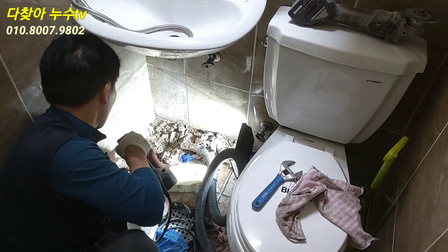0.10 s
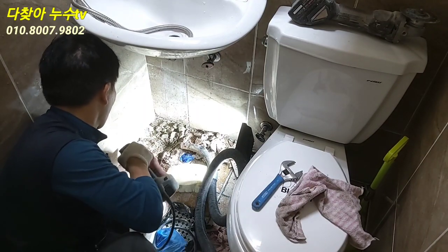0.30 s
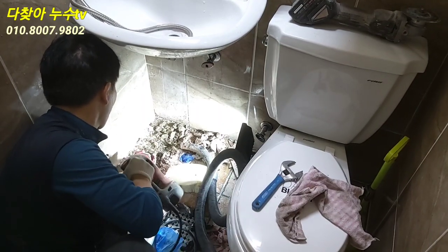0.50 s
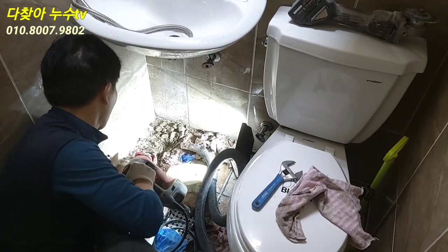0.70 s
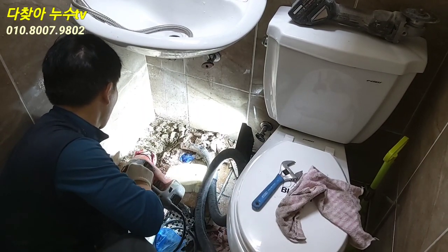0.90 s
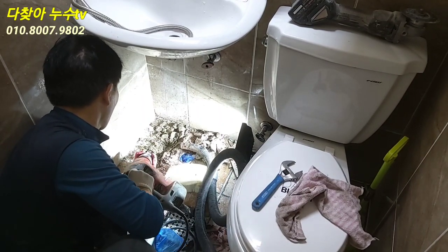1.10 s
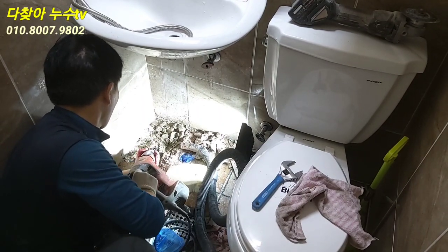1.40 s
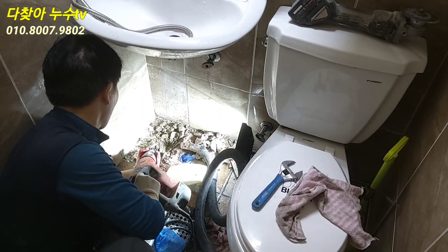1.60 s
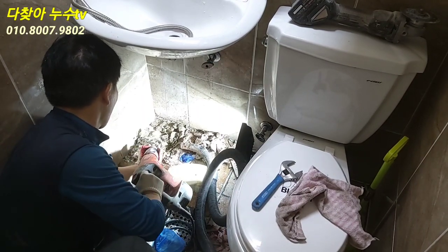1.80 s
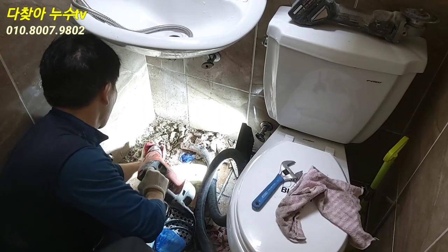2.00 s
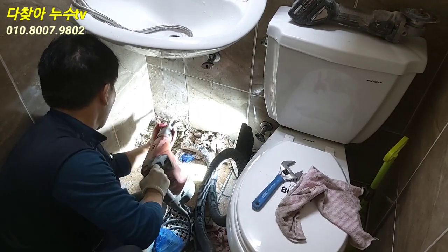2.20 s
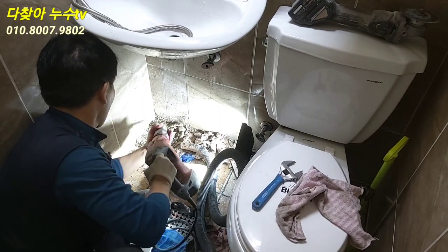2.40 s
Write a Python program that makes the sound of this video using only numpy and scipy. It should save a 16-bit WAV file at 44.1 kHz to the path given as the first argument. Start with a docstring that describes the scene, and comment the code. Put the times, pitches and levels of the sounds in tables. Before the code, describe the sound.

An electric chipping hammer whirs up and hammers tile and mortar in a rapid, uneven, metallic clatter for about two seconds, then stops with a sinking whine; steady fan-like air, small tiled bathroom, close stereo microphone.

```python
"""Air rushes steadily over a hum (likely a fan), shaped noise and sines, from first to last in a small tiled bathroom.
An electric chipping hammer spins up: its roar is shaped noise, its gear whine sines that follow a speed curve.
From 0.16 s to 2.29 s uneven blows ring the steel chisel (decaying sines), crush mortar (grains, shards, ticks),
knock the floor slab and ring the tool's shank (resonators); from 0.2 s the chisel's bending rings out in short sines.
Low noise adds the thud of the floor; after the last blow the whine sinks and the air goes on."""
import sys
import numpy as np
from scipy import signal
from scipy.fft import rfft, irfft
from scipy.io import wavfile
from scipy.ndimage import uniform_filter1d, minimum_filter1d

SR = 44100
rng = np.random.default_rng(int(sys.argv[2]) if len(sys.argv) > 2 else 0)


def to_linear_factor(level_db):
    """Convert decibel levels (scalar or array-like) to linear amplitude factors."""
    exponent = np.asarray(level_db, float) / 20
    return 10 ** exponent


def store_pcm(level_fs):
    """Save levels as 16-bit WAV."""
    pcm = np.round(np.clip(level_fs, -1, 1) * 32767).astype(np.int16)
    wavfile.write(sys.argv[1], SR, np.atleast_2d(pcm).T)


N = 110250  # samples: 2.5 s
LEAD_S = 0.003  # every blow and bending ring starts this far ahead of its listed time
CRUSH_RISE_S, CRUSH_DECAY_S = 0.0078, 0.016  # time constants of the swell under a blow


def rms_one(x):
    """Scales to rms 1."""
    return x / np.sqrt(np.mean(x ** 2) + 1e-20)


def in_time(rows):
    """Reads the columns of a time curve, one value per sample."""
    s, *columns = np.transpose(rows)
    return [np.interp(np.arange(N) / SR, s, column) for column in columns]


def noise():
    """White noise, independent in each ear."""
    return rng.standard_normal((2, N))


def band(x, order, low_hz, high_hz):
    """Keeps the sound between two frequencies."""
    return signal.sosfilt(signal.butter(order, [low_hz, high_hz], "band", fs=SR, output="sos"), x)


def colour(x, spectrum):
    """Gives white sound the spectrum, read along log frequency; rms 1."""
    hz, db = np.transpose(spectrum)
    log_hz = np.log(np.arange(N // 2 + 1) * SR / N + 1)
    gain = to_linear_factor(np.interp(log_hz, np.log(hz), db))
    return rms_one(irfft(rfft(x) * gain, N))


def drift(rate_hz):
    """Slow random wander of rms 1: white noise through two equal low-pass poles."""
    r = np.exp(-2 * np.pi * rate_hz / SR)
    wander = signal.lfilter([1], [1, -2 * r, r * r], rng.standard_normal(N + SR))
    return rms_one(wander[SR:])  # the filter settles in the first second


def ring(clicks, hz, t60):
    """A two-pole resonator: a unit click starts a dying sine of height 1."""
    r, w = to_linear_factor(-60 / (t60 * SR)), 2 * np.pi * hz / SR
    return signal.lfilter([0, np.sin(w)], [1, -2 * r * np.cos(w), r * r], clicks + 1e-18)


# spectrum of the air rush: f/Hz, relative level/dB per Hz
AIR_SPECTRUM = [(24, -53), (40, -42), (377, -17.5), (560, -10.5), (758, -14.5), (1910, -2), (8500, -16),
                (12700, -24), (14900, -11), (15400, -45)]
# hum lines of steady pitch: f/Hz, mean level/dB
HUM_LINES = [(472, -48), (822, -53), (942, -55)]


def air():
    """Steady rush as shaped noise, with hum lines whose levels waver by about 1 dB."""
    t = np.arange(N) / SR
    hum = sum(to_linear_factor(db + drift(5.8)) * np.sin(2 * np.pi * hz * t) for hz, db in HUM_LINES)
    rush = to_linear_factor(-29.5) * colour(noise(), AIR_SPECTRUM)
    return rush + hum


# motor run: t/s, gear whine f/Hz, whine level/dB, roar level/dB
MOTOR_RUN = [(0, 1000, -94, -42), (.12, 1200, -32, -43.5), (.3, 2300, -54, -22), (.5, 2455, -37.5, -19.5),
             (2.0, 2432, -36, -22.5), (2.25, 2075, -70, -28), (2.34, 1890, -43, -69), (2.5, 1500, -38, -50)]
# spectrum of the roar: f/Hz, relative level/dB per Hz
ROAR_SPECTRUM = [(35, -60), (60, -56), (400, -22), (900, -17.5), (1150, -1.5), (1600, -3), (2600, 1),
                 (4000, -3.5), (8000, -9), (12500, 0.5), (13300, -20), (13800, -4), (14400, -20),
                 (14700, -55)]
# gear lines: ratio to the whine pitch, level/dB re the whine
GEAR_LINES = [(1.0, 0), (0.84, -12), (1.7, -5.5)]


def motor():
    """Brush and cooling roar with a thin gear whine that follows the speed."""
    waver_db, wobble, flutter_db = 6, 0.012, 2.5  # whine level, whine pitch as a share, roar level
    hz, whine_db, roar_db = in_time(MOTOR_RUN)
    whine = 0
    for ratio, db in GEAR_LINES:
        pitch = ratio * hz * (1 + wobble * drift(24.93))
        turns = 2 * np.pi * np.cumsum(pitch) / SR + [[0], [np.pi / 2]]  # ears a quarter turn apart
        whine = whine + np.sin(turns) * to_linear_factor(whine_db + db + waver_db * drift(11))
    roar = to_linear_factor(roar_db + flutter_db * drift(45)) * colour(noise(), ROAR_SPECTRUM)
    return whine + roar


# thud of the floor: t/s, level/dB
THUD_LEVEL = [(0.0, -58), (0.25, -56), (0.28, -47), (0.49, -40), (0.72, -60), (0.74, -48), (0.87, -37),
              (1.13, -56), (1.48, -42), (1.66, -60), (1.76, -43), (2.1, -81), (2.11, -45), (2.5, -68)]


def thud():
    """Low floor noise, partly alike in both ears, that swells and sinks along its level curve."""
    level_db, = in_time(THUD_LEVEL)
    shared = 0.83 * rng.standard_normal(N)
    return to_linear_factor(level_db) * rms_one(band(noise() + shared, 2, 34.7, 250))


# blows: t/s, strength level/dB, lower chisel ring level/dB re strength, crushing level/dB
BLOW_LIST = [(0.158, -41.5, -22, -35), (0.177, -29, -23, -28), (0.2113, -11, -16, -24),
             (0.239, -8, -25, -25.5), (0.263, -10.5, -19, -29), (0.2846, -8, -25, -30),
             (0.312, -2, -26, -24), (0.3358, -6, -26, -21), (0.3575, -1, -21, -23), (0.3772, -9, -24, -21),
             (0.397, 2, -22, -17.5), (0.4297, -1, -34, -16.5), (0.4621, -5, -33, -17.5),
             (0.4841, -7, -30, -19.5), (0.5089, 1, -36, -19), (0.532, 5.5, -26, -14),
             (0.5949, 0.5, -25, -17.5), (0.631, -9, -16, -24), (0.6676, -2.5, -17, -28),
             (0.7084, -49, -4, -23.5), (0.75, -3, -16, -18.5), (0.7815, -1.5, -7, -16.5),
             (0.816, -3, -13, -14.5), (0.8323, -2, -11, -23), (0.8507, 4.5, -27, -21.5),
             (0.8718, 0, -18, -17), (0.9002, -2, -6, -17.5), (0.9292, 0, -18, -10.5),
             (0.9672, -8, -1, -19.5), (0.997, -2.5, -3, -21), (1.0307, -7.5, 1, -20),
             (1.0666, -13, 5, -17.5), (1.1002, -10, 3, -35), (1.122, -14.5, 6, -20),
             (1.1628, -14, 5.5, -20), (1.198, -7.5, 3, -19), (1.2219, -3, -2, -24.5),
             (1.2374, -10, -4, -25), (1.2584, -7, 1, -26), (1.2854, -12, -25, -19.5), (1.302, -6, -24, -34),
             (1.3328, -7, -29, -17.5), (1.363, -4.5, -13, -17.5), (1.4002, -6, -15, -16),
             (1.432, -10, -9, -17), (1.4583, -11, -2, -21), (1.4776, -10, 1, -17),
             (1.5043, -6.5, -3, -21.5), (1.5304, -12.5, 1, -20.5), (1.5621, -11, 0.5, -17.5),
             (1.5963, -8, 0, -24.5), (1.6325, -14.5, 1.5, -20), (1.6723, -11, 0, -20),
             (1.7118, -18.5, 10.5, -15.5), (1.7457, -2, -8, -23), (1.7747, -6, -3, -18),
             (1.803, -2, -11, -18), (1.826, 0, -39, -21.5), (1.859, -3, -23, -19), (1.8822, 1, -29, -22.5),
             (1.8968, -0.5, -19, -23), (1.9191, 5.5, -31, -18), (1.9583, -10, -31, -16.5),
             (1.9904, -3, -18, -22), (2.01, -8, -22, -23), (2.041, -2.5, -21, -27.5), (2.073, -7, -14, -35),
             (2.1019, -6, -13, -21), (2.129, -3, -24, -23), (2.1562, -5, -17, -35),
             (2.1912, -7.5, -14, -23.5), (2.216, -8.5, -13, -33), (2.2586, -15.5, -12, -59),
             (2.289, -46, -21, -40)]


def strokes(db, decay_s, rise_s):
    """An envelope that swells at every blow and dies away."""
    clicks = np.zeros(N)
    clicks[((np.array(BLOW_LIST)[:, 0] - LEAD_S) * SR).astype(int)] = to_linear_factor(db)
    fall, rise = np.exp(-1 / (decay_s * SR)), np.exp(-1 / (rise_s * SR))
    return signal.lfilter([1 - rise], np.convolve([1, -fall], [1, -rise]), clicks + 1e-18)


# chisel modes: nominal f/Hz, relative level/dB, t60/s, 1 if part of the lower ring
CHISEL_MODES = [(11775, 3, 0.097, 0), (11800, -19, 0.058, 0), (10640, -16, 0.096, 0), (11400, -9, 0.065, 0),
                (11700, -7, 0.14, 0), (13900, -16, 0.05, 0), (14250, -21, 0.035, 0), (14150, -22, 0.035, 0),
                (6740, -20, 0.11, 0), (6580, -28, 0.036, 0), (3440, -25, .05, 0), (2386, -22, 0.091, 0),
                (9125, 2.5, 0.13, 1), (9160, 3.5, 0.07, 1)]


def chisel():
    """Each blow builds up every steel mode in a new phase; the tip reseating damps it before the next."""
    ring_db, scatter_db, bend_share = -1.5, 2.5, 0.003  # overall; level and pitch spread per mode and blow
    rise_s, reseat_s = 0.0068, 0.0025
    ear_rad, ear_spread_rad = 1.5, 0.96  # phase between the ears: mean, spread
    s, strength, lower, _ = np.transpose(BLOW_LIST)
    t, s = np.arange(N) / SR, s - LEAD_S
    last = np.searchsorted(s, t) - 1  # the latest blow at each sample
    since = np.maximum(t - s[last], 0)
    until = np.append(s, 10)[last + 1] - t
    shape = (1 - np.exp(-since / rise_s)) ** 2 * (1 - np.exp(-until / reseat_s))
    chance = rng.standard_normal((len(BLOW_LIST), len(CHISEL_MODES), 4))
    out = 0
    for k, (hz, db, t60, low) in enumerate(CHISEL_MODES):
        scatter, phase, ear, bend = chance[:, k].T
        start_db = db + strength + lower * (low > 0.5) + scatter_db * scatter
        level_db = start_db[last] - 60 * since / t60
        ear_phase = (ear_rad + ear_spread_rad * ear) * [[0.5], [-0.5]]
        start_phase = 10 * phase + ear_phase
        turns = 2 * np.pi * hz * (1 + bend_share * bend[last]) * since + start_phase[:, last]
        out = out + to_linear_factor(level_db) * np.sin(turns)
    return to_linear_factor(ring_db) * shape * out


# spectrum of the crushed grit: f/Hz, relative level/dB per Hz
GRIT_SPECTRUM = [(24, -53), (40, -30), (369, -31), (651, -11.5), (900, -10), (1150, 0.5), (1790, -10),
                 (3490, -3), (6960, -12.5), (9130, -2.5), (10100, -23.5), (11700, 3.5), (13600, -20.5),
                 (14300, -14), (14700, -60)]


def crushing():
    """Mortar breaks under each blow: random grit grains, ringing tile shards and a striker tick."""
    grit_per_s, shards_per_s, size_spread_db = 6000, 700, 4
    crush_db, shard_db, shard_cycles = 4.5, -4.5, 42  # all but tick; shards re grit; cycles to fall 60 dB
    crush_level = np.array(BLOW_LIST)[:, 3]
    force = strokes(crush_level, CRUSH_DECAY_S, CRUSH_RISE_S)
    sizes = to_linear_factor(size_spread_db * np.minimum(rng.exponential(1, (2, N)), 3))
    sizes = sizes * rng.choice([-1, 1], (2, N))
    draw, dealt = rng.random((2, N)), rng.integers(0, 20, (2, N))
    grit = colour(sizes * (draw < grit_per_s / SR), GRIT_SPECTRUM) * force
    hits = force * sizes * (draw < shards_per_s / SR)
    pitches = np.geomspace(1350, 4790, 20)  # Hz
    # each hit is dealt to one of the pitches
    shards = sum(ring(hits * (dealt == k), hz, shard_cycles / hz) for k, hz in enumerate(pitches))
    shards = to_linear_factor(shard_db) * rms_one(shards) * np.sqrt(np.mean(grit ** 2))
    tick = to_linear_factor(7.5) * band(noise(), 3, 3020, 12200) * strokes(crush_level, 0.0022, 0.00022)
    return tick + to_linear_factor(crush_db) * (grit + shards)


# hollow knock of the slab: t/s, relative level/dB
KNOCK_LEVEL = [(0.2, -54), (0.23, -64), (0.54, -21), (0.7, -31.5), (0.82, -23), (1.16, -42.5),
               (1.32, -15.5), (1.42, -36.5), (1.61, -24.5), (1.63, -24), (1.9, -28), (1.92, -17),
               (1.99, -8.5), (2.04, -63), (2.12, -57), (2.25, -62)]


def slab():
    """The same blows knock a hollow spot of the floor: noise bursts excite one resonance."""
    level_db, = in_time(KNOCK_LEVEL)
    knocks = noise() * strokes(0, CRUSH_DECAY_S, CRUSH_RISE_S)
    return to_linear_factor(level_db - 4) * rms_one(ring(knocks, 1274.5, 0.061))


# middle ring of the tool: t/s, relative level/dB
SHANK_LEVEL = [(0.15, -57), (0.24, -41), (0.33, -49), (0.49, -32), (0.54, -44), (0.6, -28), (0.65, -38),
               (0.77, -44), (0.86, -29.5), (1.05, -34), (1.07, -42), (1.38, -44), (1.58, -27.5), (1.6, -43),
               (1.74, -26), (1.81, -45), (1.97, -51), (1.99, -42), (2.08, -35), (2.17, -45), (2.22, -36),
               (2.3, -64)]


def shank():
    """Rattling contact under each blow keeps a middle mode of the tool flickering."""
    level_db, = in_time(SHANK_LEVEL)
    rattle = noise() * strokes(0, 0.025, CRUSH_RISE_S)
    return to_linear_factor(level_db + 4) * rms_one(ring(rattle, 5843, 0.079))


# short clear rings of the chisel bending, main mode mostly 2 to 4 kHz: t/s, relative level/dB, main mode f/Hz
BEND_LIST = [(0.208, -17, 2530), (0.2248, -17, 3080), (0.2747, -14, 3520), (0.3396, -11, 2510),
             (0.4166, -10, 2410), (0.4672, 2, 2370), (0.4952, -6, 2350), (0.5251, -2.5, 3420),
             (0.549, -2, 3375), (0.664, -6, 3870), (0.7064, -17, 3330), (0.7421, -5, 3800),
             (0.806, -8, 3430), (0.9, -4, 2570), (0.9171, -0.5, 2414), (0.9696, -13, 1790),
             (1.0225, -5, 2120), (1.0534, -19, 2320), (1.088, -13, 2716), (1.1227, -9, 3450),
             (1.1616, -16, 2220), (1.1936, -11, 2230), (1.2494, -14, 3340), (1.2824, -8, 2670),
             (1.3168, -10, 3420), (1.3778, -9, 1850), (1.4462, -10, 2260), (1.507, -2, 3390),
             (1.5368, -4, 2150), (1.5673, -7, 1950), (1.6715, -17, 2030), (1.7094, -18, 2370),
             (1.745, -29, 2370), (1.77, -15, 3280), (1.7902, -8, 2100), (1.9263, -11, 3350),
             (1.9613, -8, 3140), (2.0137, -14, 2560), (2.1639, -20, 2520)]


def chisel_bends():
    """The bending chisel rings briefly in three close modes, in other phases for each ear."""
    bend_db, t60_s, rise_s, pitch_spread = -6.5, 0.068, 0.0047, 0.0654  # spread as a share of pitch
    t, out = np.arange(SR // 5) / SR, np.zeros((2, N + SR))
    shape = (1 - np.exp(-t / rise_s)) * to_linear_factor(-60 * t / t60_s)
    for (s, db, hz), chance in zip(BEND_LIST, rng.standard_normal((len(BEND_LIST), 3, 3))):
        start = int((s - LEAD_S) * SR)
        for mode, (stray, left, right) in enumerate(chance):
            # the main mode keeps its pitch; the further ones stray more and are softer
            mode_hz = hz * (1 + pitch_spread * mode * stray)
            turns = 2 * np.pi * mode_hz * t + 10 * np.array([[left], [right]])
            out[:, start:start + len(t)] += to_linear_factor(db + bend_db - 3.2 * mode) * shape * np.sin(turns)
    return out[:, :N]


def bathroom(x):
    """Dense dying reflections off the tiles, other ones for each ear."""
    t60_s, room_db, gap_s = 0.16, -8.5, 0.0014
    t = np.arange(SR // 2) / SR
    tail = rng.standard_normal((2, len(t))) * to_linear_factor(-60 * t / t60_s) * (t > gap_s)
    tail = tail / np.sqrt(np.sum(tail ** 2, axis=1, keepdims=True))
    return x + to_linear_factor(room_db) * signal.fftconvolve(x, tail, axes=1)[:, :N]


def scene():
    """The blows echo in the bathroom; motor and air are added without echo."""
    blows = chisel() + crushing() + slab() + thud() + shank() + chisel_bends()
    return air() + motor() + bathroom(blows)


def band_limit(x):
    """A steep low-pass at the top of the band."""
    return signal.sosfilt(signal.butter(12, 15610, fs=SR, output="sos"), x)


def record(dry):
    """The microphone cuts the deep bass and a limiter turns both ears down together around peaks."""
    mic_cut_hz, limit_db, limit_s = 79, 0.23, 0.0053
    heard = signal.sosfilt(signal.butter(2, mic_cut_hz, "high", fs=SR, output="sos"), dry)
    span = int(limit_s * SR) + 1
    allowed = np.minimum(1, to_linear_factor(limit_db) / (np.abs(heard).max(axis=0) + 1e-9))
    gain = uniform_filter1d(minimum_filter1d(allowed, span), span)
    return band_limit(heard * gain)


dry = scene()
out = record(dry)
store_pcm(out)
```